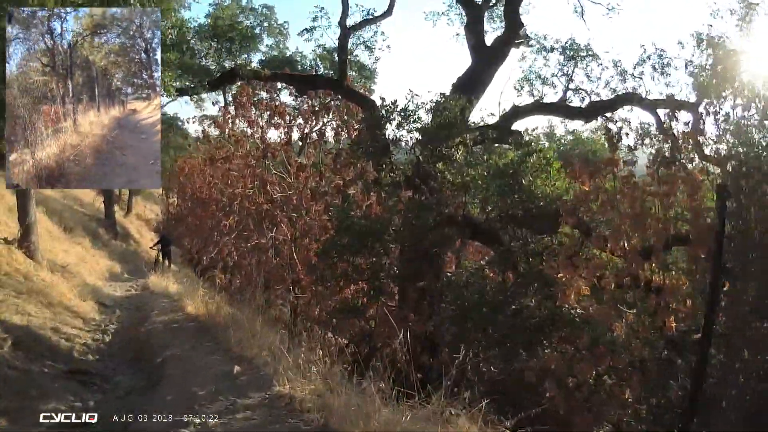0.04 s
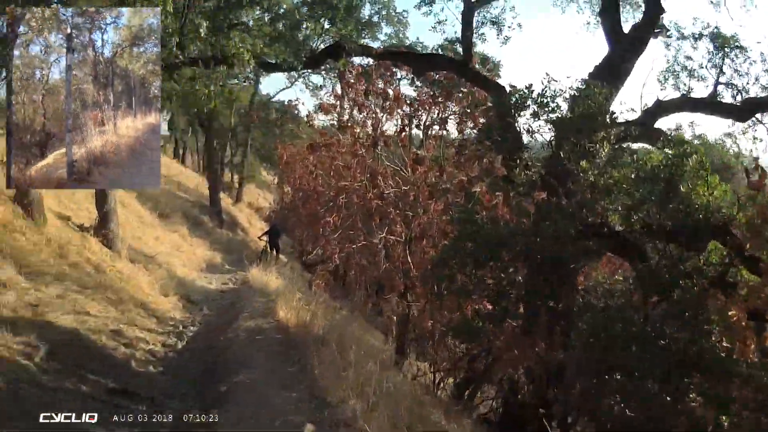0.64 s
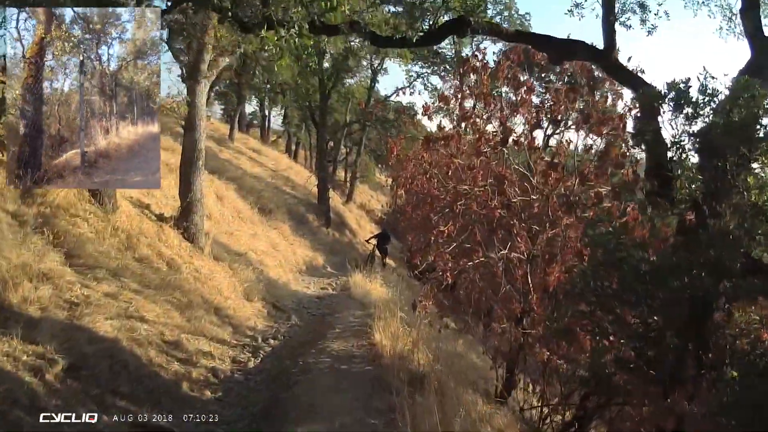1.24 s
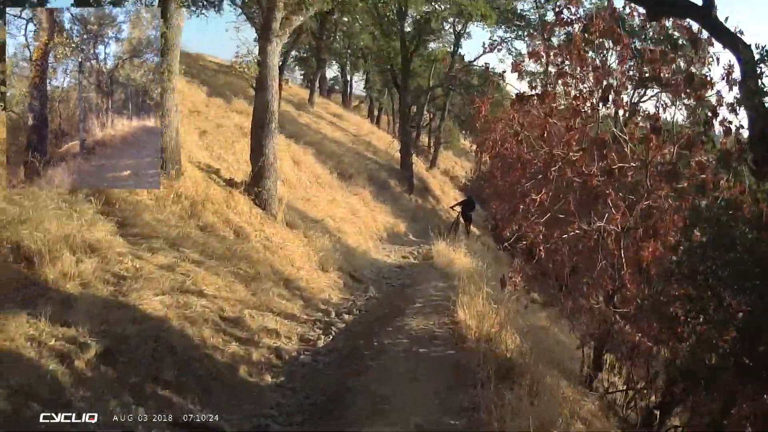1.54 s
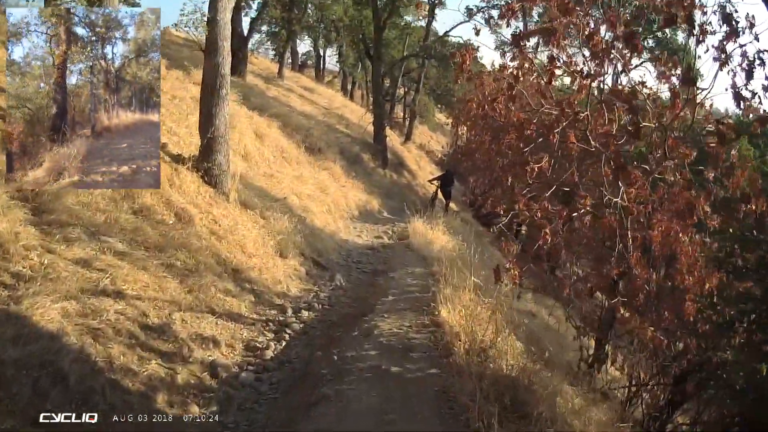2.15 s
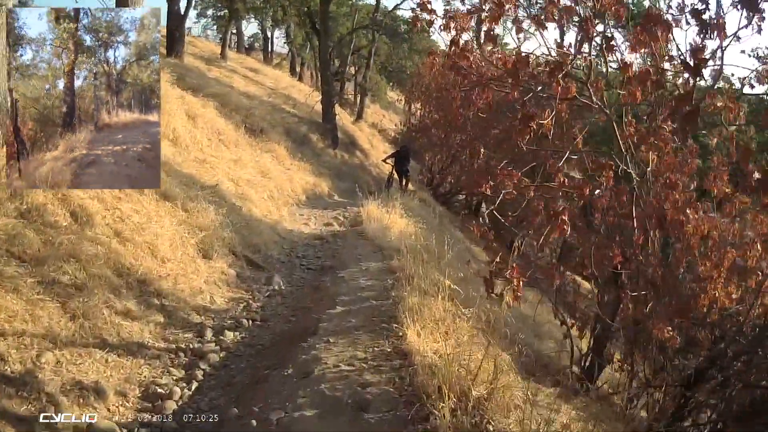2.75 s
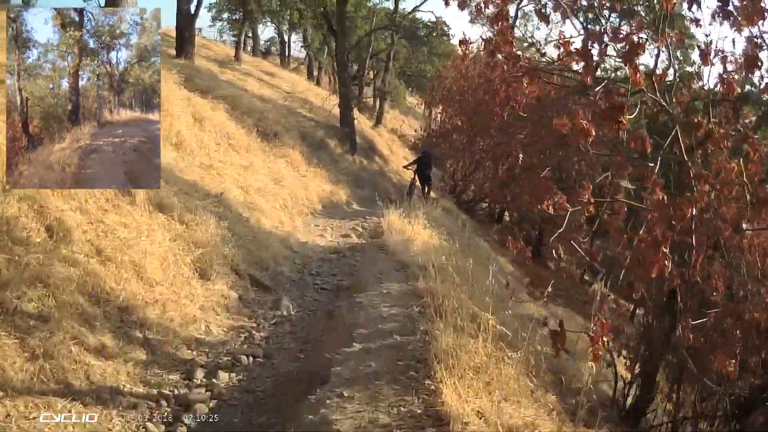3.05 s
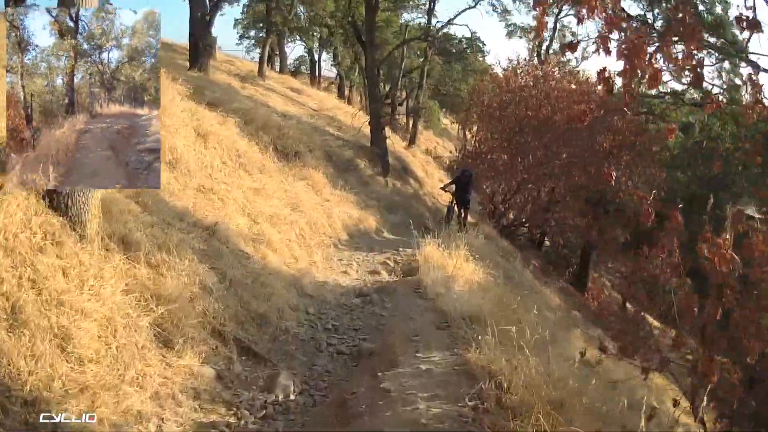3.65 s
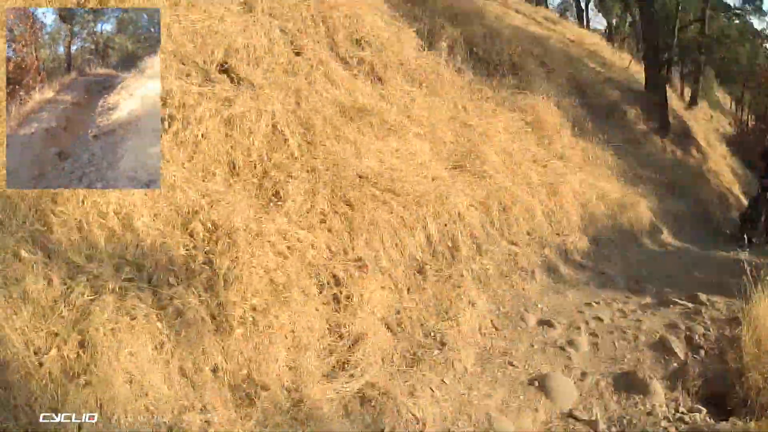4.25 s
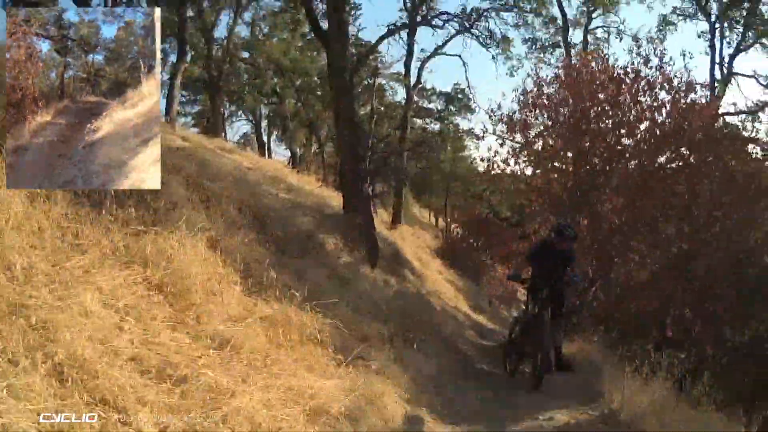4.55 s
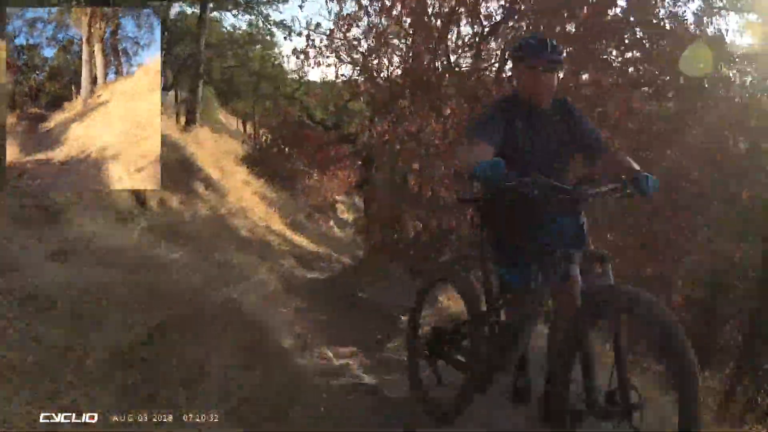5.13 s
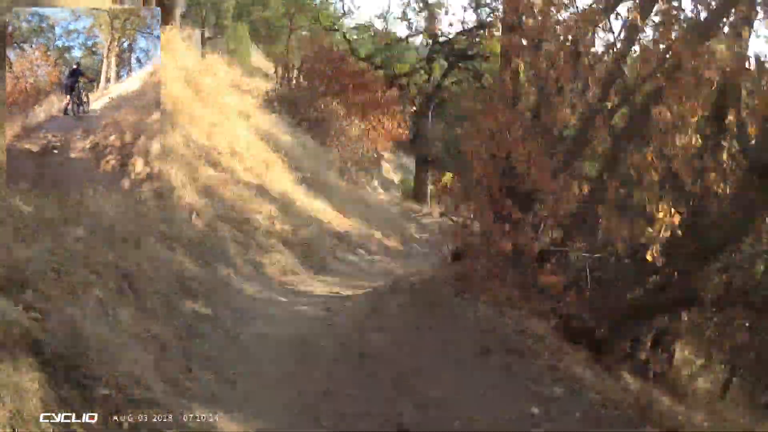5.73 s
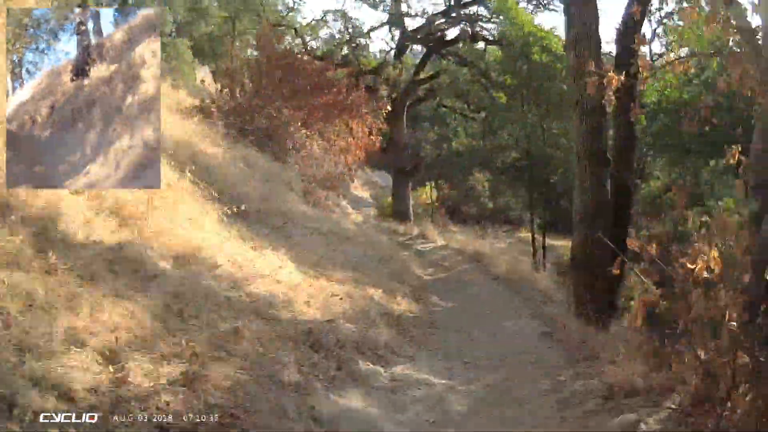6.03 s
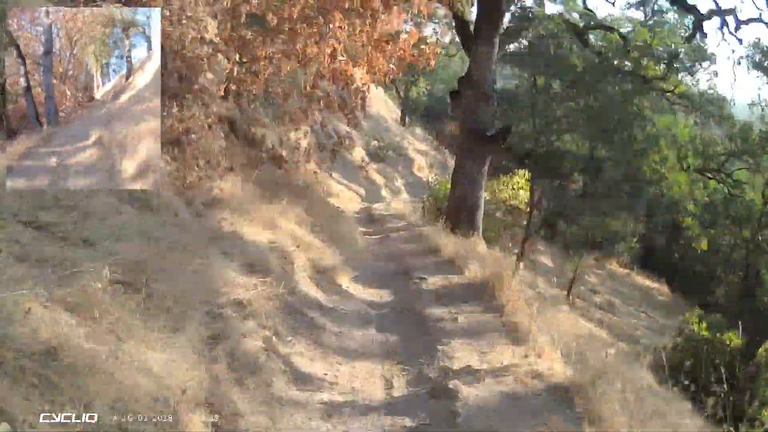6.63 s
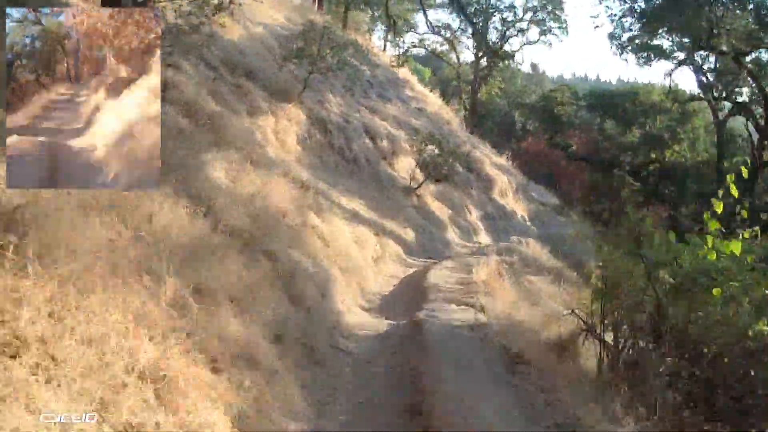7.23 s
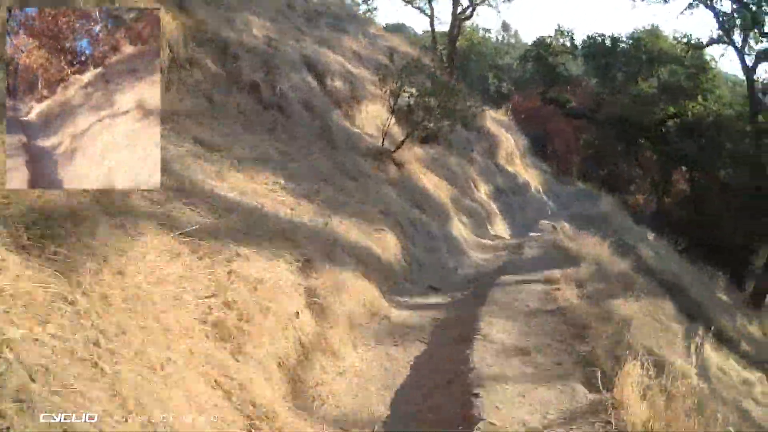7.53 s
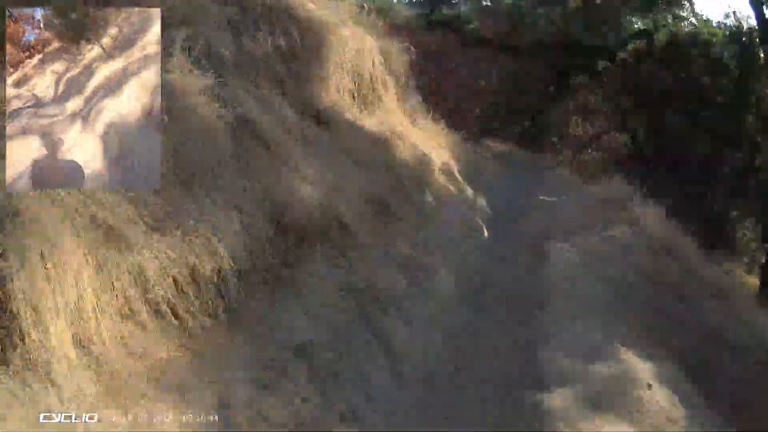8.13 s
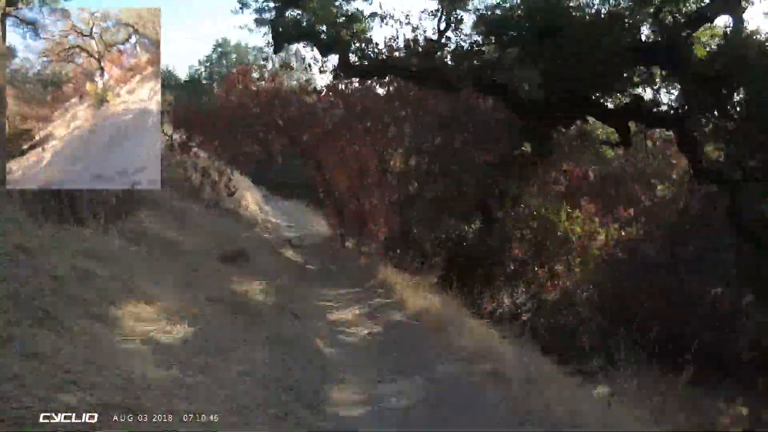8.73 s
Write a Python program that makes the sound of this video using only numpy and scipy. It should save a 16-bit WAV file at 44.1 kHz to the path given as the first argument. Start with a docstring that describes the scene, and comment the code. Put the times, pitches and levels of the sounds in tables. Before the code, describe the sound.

Bright clicks and hollow knocks clatter close to a bike-mounted microphone as a mountain bike bumps along a dirt trail outdoors. The rattle peaks with a few hard gravel crunches, then eases for a moment. In the second half the pace picks up and gritty tyre crunching and crackling take over, with lighter ticks from kicked stones. Soft rushing air and a low shaking rumble continue throughout.

```python
"""Sharp ticks and dull knocks rattle up the camera mount of a mountain bike rolling down a dry dirt trail.
Later the bike gathers speed and the tyres crunch through loose grit: the looser the ground, the more
stones the tread kicks up, and the ground noise ducks in a short hop before a landing.
Frame rumble and a rush of air lie underneath. The hits and grit are coloured by the mount and by the
small camera's plastic case, which rings differently at each of its two microphone ports."""
import sys
import numpy as np
from scipy import signal
from scipy.fft import rfft, irfft
from scipy.io import wavfile

SR = 44100
rng = np.random.default_rng(int(sys.argv[2]) if len(sys.argv) > 2 else 0)


def transcribe(signal):
    """Save signal, clipped to [-1, 1], as a 16-bit WAV file at the path in sys.argv[1]."""
    frames = np.atleast_2d(signal).T
    limited = np.clip(frames, -1, 1)
    pcm = np.round(limited * 32767).astype(np.int16)
    wavfile.write(sys.argv[1], SR, pcm)


N = 391608

# the trail under the tyres: t/s, loose grit/dB, fine dirt/dB, bumpiness/dB, frame shake/dB
TRAIL = [(0, -47, -50, -76, -62), (.45, -43.5, -47, -65, -60), (.8, -40, -38, -57, -59),
         (2.5, -38, -43.5, -46.5, -53), (3.45, -39.5, -40.5, -75, -52), (3.73, -41, -44, -68, -59),
         (3.9, -42, -51, -73, -65.5), (4.25, -34.5, -43.5, -43, -61), (4.6, -45.5, -50.5, -63, -59),
         (4.92, -44, -45.5, -49, -64.5), (5.15, -37.5, -43, -54, -60.5), (5.92, -36.5, -47, -46.5, -56.5),
         (6.12, -33, -36, -41, -58), (6.45, -33.5, -34, -42, -53), (6.65, -35, -48, -60, -52.5),
         (6.92, -33.5, -37, -38.5, -58.5), (7.3, -31, -31.5, -44, -52), (7.75, -33.5, -36.5, -41.5, -50.5),
         (8.1, -36, -46, -51, -52.5), (8.6, -34, -34.5, -37.5, -58)]
# the pace of the ride: t/s, tread knob rate/Hz, air rush/dB
ROLLING = [(0, 22.1, -51.5), (1.2, 24.7, -50.5), (3.4, 24.9, -46.5), (3.9, 26.3, -54.5), (4.5, 25, -57.5),
           (5.6, 33, -52), (7.4, 54.2, -47), (8.88, 51.5, -54)]
# tyres landing in gravel: t/s, level/dB, length/ms, dip in the hop before/dB (negative: a swell)
LANDINGS = [(.788, -35, 12, 9), (2.409, -35, 12, -1), (2.509, -25, 13, 5), (2.542, -28.5, 7.8, -2),
            (2.798, -21.5, 14.3, -1), (2.819, -17.5, 10.8, 2), (2.890, -23, 7.1, -10.5),
            (2.974, -31, 8.8, 0), (2.999, -27, 12, -6), (3.052, -24.5, 7.5, -4), (4.099, -38, 36, 1),
            (4.140, -34, 15, -5), (4.24, -35, 13.5, 4), (4.285, -32.5, 6.7, -1), (4.338, -33.5, 23, -3),
            (4.492, -32.5, 9.6, 19), (4.808, -36.5, 17, 0.5), (5.039, -30.5, 23.4, 3),
            (5.390, -41.5, 29, 9), (5.486, -29, 19, 6), (5.541, -29.5, 27, -5), (5.805, -34.5, 8.8, -1),
            (6.040, -33.5, 37.6, -3.5), (6.111, -32, 21.6, -5), (6.325, -39, 16.8, 1.5),
            (6.794, -32.5, 9.3, 1), (6.865, -34.5, 27, 4.5), (7.064, -31, 22, 7.5), (7.211, -33.5, 16, 0),
            (7.26, -34.5, 41, -1), (7.312, -27.5, 8.5, 0.5), (7.650, -33, 48, 0), (7.799, -32.5, 29, 5),
            (8.015, -27.5, 14.8, 9), (8.241, -32, 31, 0.5), (8.620, -30, 26, 5), (8.707, -31, 19, 4)]
# modes of the plastic case: f/Hz, width/Hz, left port/dB, right port/dB
CASE_MODES = [(560, 230, 3, 3), (1016, 250, 0.5, 4), (1784, 810, 4, 7.5), (2163, 406, 13.5, 13.5),
              (2410, 328, 14, 14), (2952, 494, 2.5, 16.5), (3203, 292, 15, 20.5), (3376, 586, 11, 15),
              (4200, 360, 11, 7.5), (4630, 183, 4, 10.5), (5160, 570, 11.5, -9), (5796, 410, 14.5, -8),
              (6090, 440, 6, 12), (6560, 455, 16, -16), (7380, 560, -8, 10.5), (7920, 310, 11.5, 9.5),
              (8640, 690, 2, 7), (9601, 637, 18, 12), (9574, 415, 20.5, 14), (10760, 1020, -0.5, 12.5),
              (12730, 4400, 0, 0), (15100, 560, 0, 4.5)]
# modes of the mount: f/Hz, width/Hz, left port/dB, right port/dB
MOUNT_MODES = [(182, 19, 5.5, 5.5), (334, 16, -4, 8.5), (473, 46, 11.5, -4), (486, 13, 13.5, 8.5),
               (501, 113, 16, 19), (636, 131, 21, 21.5), (687, 250, 8.5, -10), (920, 174, 15, 12.5),
               (1175, 58, 12, 14.5), (1702, 67, 20.5, 10), (2015, 123, -5, 21), (2350, 310, 6, 14.5),
               (2900, 400, 4, 12), (3820, 1000, 6, -18), (6300, 3900, 3.5, -11)]

CASE_LAG_MS, MOUNT_LAG_MS = 0.2178, 0.32   # the right port hears each body this much later
RING_SIZE, TICK_SPAN_MS = 1536, 6.3   # samples in a body's ring; span that sets a tick's level
LOOSE_GRIT_DB = -34   # grit level that counts as loose ground


def from_db(db):
    """Decibels to gain."""
    return 10 ** (np.asarray(db) / 20)


def rms_one(x):
    """Scale to rms 1."""
    return x / np.sqrt(np.mean(x ** 2) + 1e-20)


def level_over(sound, ms):
    """Rms of a short stereo sound if all its energy fell within ms."""
    return np.sqrt(np.sum(sound ** 2) / 2 / (ms / 1000 * SR) + 1e-20)


def in_time(rows):
    """Each column of an automation table, sample by sample."""
    times, *columns = np.transpose(rows)
    return [np.interp(np.arange(N) / SR, times, column) for column in columns]


def add(out, s, sound):
    """Mix a sound into the stereo track at time s."""
    i = int(np.clip(round(s * SR), 0, N - 1))
    out[:, i:i + sound.shape[1]] += sound[:, :N - i]


def butter(kind, hz, order=2):
    """A Butterworth filter as a function."""
    sos = signal.butter(order, np.clip(hz, 10, .45 * SR), kind, fs=SR, output="sos")
    return lambda x: signal.sosfilt(sos, x)


def drift(rate_hz):
    """Smooth random modulation, rms 1."""
    hz = np.fft.rfftfreq(N, 1 / SR)
    return rms_one(irfft(rfft(rng.standard_normal(N)) / (1 + (hz / rate_hz) ** 2), N))


def port_noise(size, apart):
    """Noise common to both ports, widened by `apart` times a noise of each port's own."""
    return rng.standard_normal(size) + apart * rng.standard_normal((2, size))


def coloured_noise(spectrum, apart):
    """Steady stereo noise of a given spectrum, rms 1."""
    hz, db = np.transpose(spectrum)
    log_hz = np.log(np.fft.rfftfreq(N, 1 / SR) + 1e-9)
    colour = from_db(np.interp(log_hz, np.log(hz), db, left=-25, right=-70))
    return rms_one(irfft(rfft(port_noise(N, apart)) * colour, N))


def body_ring(modes, lag_ms, vary_db=0):
    """A tapped body rings at the two ports; each spot tapped reweights its modes by about vary_db."""
    hz, width, left_db, right_db = np.transpose(modes)
    t = np.arange(RING_SIZE) / SR - np.array([[0], [lag_ms / 1000]])
    spot_db = vary_db * rng.standard_normal(len(hz))
    polarity = (-1) ** np.arange(len(hz))
    gains = from_db([left_db + spot_db, right_db + spot_db]) * width * polarity
    age = np.maximum(t, 0)[:, None]
    rings = np.exp(-np.pi * width[:, None] * age) * np.sin(2 * np.pi * hz[:, None] * age)
    return rms_one((gains[..., None] * rings).sum(axis=1))


def drive(body, force):
    """A force sets a body ringing."""
    return signal.fftconvolve(np.atleast_2d(force), body, axes=1)


def air_rush():
    """A smooth bed of air rushing past the camera."""
    # spectrum of the rush: f/Hz, level/dB
    spectrum = [(150, -23), (350, -6), (520, 12.5), (750, -6), (1100, 12.5), (1600, 2), (2200, 4.5),
                (3100, 12), (4500, 2.5), (9000, -58)]
    _, rush_db = in_time(ROLLING)
    return from_db(rush_db) * coloured_noise(spectrum, apart=0.82)


def frame_rumble(gain_db=1.0, lumpy_db=3.0):
    """The frame shakes: a lumpy low end, alike at both ports."""
    # spectrum of the shaking frame: f/Hz, level/dB
    spectrum = [(20, 3.5), (33, -14), (46, 4), (60, -3.5), (100, -5), (150, -12), (250, -13.5),
                (400, -11.5), (800, -47)]
    *_, shake_db = in_time(TRAIL)
    return from_db(shake_db + gain_db + lumpy_db * drift(12)) * coloured_noise(spectrum, apart=0.024)


def tyre_thumps(decay_s=0.0063, gain_db=6.5):
    """A tyre squashes on a bump and rings softly for a few cycles."""
    # tyre squashes: t/s, level/dB, f/Hz
    squashes = [(2.284, -45.5, 189), (2.641, -48, 298), (2.822, -39.5, 313), (2.973, -49, 234),
                (3.388, -46, 117), (5.036, -50.5, 317), (5.313, -52.5, 144), (5.484, -47, 315)]
    out, t = np.zeros((2, N)), np.arange(4 * RING_SIZE) / SR
    swell = t / decay_s * np.exp(1 - t / decay_s)
    for s, db, hz in squashes:
        thump = swell * np.sin(2 * np.pi * hz * t)
        add(out, s, from_db(db + gain_db) * thump[None])
    return out


def metal_pings(apart_rad=0.5):
    """Now and then a bump leaves a metal part ringing."""
    # ringing bike parts: t/s, peak level/dB, f/Hz, t60/s
    rings = [(1.458, -33, 1020, 0.14), (2.404, -33, 3080, 0.13), (2.486, -23, 1140, 0.069),
             (2.854, -31, 960, 0.067), (7.006, -30, 2090, 0.056), (7.217, -30, 2060, .06),
             (7.439, -24, 2060, 0.047)]
    out, t = np.zeros((2, N)), np.arange(5 * RING_SIZE) / SR
    for s, db, hz, t60 in rings:
        tone = np.sin(2 * np.pi * hz * t - [[0], [apart_rad]])
        add(out, s, from_db(db - 60 * t / t60) * tone)
    return out


def knob_count():
    """Running count of tread knobs meeting the ground, at a slightly uneven pace."""
    knob_hz, _ = in_time(ROLLING)
    return np.cumsum(knob_hz * (1 + 0.18 * drift(12.3))) / SR


def tread_pressure(knobs, sharpness=2.1, uneven_db=3.5, floor=0.41):
    """Each tread knob presses on the ground in a short swell; rms 1."""
    swell = np.exp(sharpness * (np.cos(2 * np.pi * knobs) - 1))
    return rms_one(floor + swell * from_db(uneven_db * drift(18)))


def looseness(grit_db):
    """How freely the ground gives up stones: 1 on loose grit."""
    return from_db(grit_db - LOOSE_GRIT_DB)


def tyre_grip(lead_ms=32.7, half_width_ms=20):
    """Gain on the ground noise just before each landing: it ducks as the tyre hops, or else swells."""
    ms, gain_db = np.arange(N) / SR * 1000, np.zeros(N)
    for s, _, _, dip_db in LANDINGS:
        from_hop = (ms - 1000 * s + lead_ms) / half_width_ms
        gain_db -= dip_db / (1 + from_hop ** 4)
    return from_db(gain_db)


def grains(modes, lag_ms, per_s, level_db, spread_db, chatter_ms, vary_db, count=32):
    """Small random impacts on a body, drawn from a pool of hits that vary in chatter and colour."""
    out, ms = np.zeros((2, N)), np.arange(RING_SIZE // 4) / SR * 1000
    pool = []
    for length_ms in chatter_ms * rng.uniform(0.3, 1.77, count):
        force = port_noise(len(ms), apart=0.52) * np.exp(-ms / length_ms)
        hit = drive(body_ring(modes, lag_ms, vary_db), force)
        pool.append(hit / level_over(hit, TICK_SPAN_MS))
    chance, size, pick = rng.random(N), rng.standard_normal(N), rng.integers(0, count, N)
    for i in np.flatnonzero(chance < per_s / SR):
        add(out, i / SR, from_db(level_db[i] + spread_db * min(size[i], 1.6)) * pool[pick[i]])
    return out


def rolling_tyres(case, knobs, scuff_db=-5.5, fine_db=-2.5, patchy_db=6.0):
    """The tread scuffs through grit and dirt, flicking up small stones and jiggling the mount."""
    grit_db, dirt_db, bump_db, _ = in_time(TRAIL)
    pressure = tread_pressure(knobs)
    sand = port_noise(N, apart=0.81) * from_db(9.6 * drift(270))
    scuff = from_db(grit_db + scuff_db) * pressure * rms_one(drive(case, sand)[:, :N])
    dull_case = butter("low", 2800, order=1)(case)
    dirt_gain = from_db(dirt_db + fine_db + patchy_db * drift(24)) * np.sqrt(pressure)
    dirt = dirt_gain * rms_one(drive(dull_case, port_noise(N, apart=0.76))[:, :N])
    stones = grains(CASE_MODES, CASE_LAG_MS, per_s=110 * looseness(grit_db), level_db=grit_db - 6,
                    spread_db=3, chatter_ms=0.73, vary_db=3.0)
    jiggle = grains(MOUNT_MODES, MOUNT_LAG_MS, per_s=65, level_db=bump_db + 3.5,
                    spread_db=4, chatter_ms=1.36, vary_db=1.5)
    return scuff + dirt + stones + butter("low", 1500, order=1)(jiggle)


def gravel_crunches(case, mount, grain_db=7.0, soft_hz=3200, mount_db=-11, gain_db=4.0):
    """Gravel gives way under a landing tyre in a swell of tiny fractures."""
    out, size = np.zeros((2, N)), 3 * RING_SIZE
    ms = np.arange(size) / SR * 1000
    body = rms_one(butter("low", soft_hz, order=1)(case)) + from_db(mount_db) * mount
    for s, db, length_ms, _ in LANDINGS:
        age = ms / length_ms
        swell = age * np.exp(-(age / 0.8) ** 2)
        fractures = from_db(grain_db * np.repeat(rng.standard_normal(size // 32), 32))
        crunch = drive(body, port_noise(size, apart=1.0) * fractures * swell)
        add(out, s, from_db(db + gain_db) * crunch / level_over(crunch, length_ms))
    return out


def mount_knocks(mount, rub=0.11, rub_ms=2.55, rebound_s=0.031, rebound_db=-19, hard_db=-19, hard_hz=2700):
    """The mount takes up its play with a bump and a brief rub, then falls back once."""
    # knocks of the mount over bumps: t/s, level/dB
    bumps = [(.6315, -21), (.8146, -21.5), (1.067, -35.5), (1.189, -32), (1.2476, -33), (1.316, -27.5),
             (1.4583, -23), (1.5954, -27), (1.6536, -29.5), (1.7493, -24.5), (1.8717, -26), (1.9015, -28),
             (2.0204, -21), (2.0736, -23), (2.2285, -30), (2.3185, -22.5), (2.3662, -20.5), (2.476, -23),
             (2.5127, -23.5), (2.6485, -25.5), (2.8235, -23), (2.8903, -20.5), (3.0003, -20.5),
             (3.0535, -26), (3.2872, -34.5), (3.3782, -29), (4.1259, -37), (4.1438, -36), (4.3386, -32),
             (4.7972, -33.5), (4.826, -34), (5.4998, -36), (5.5415, -32), (5.812, -34), (6.4497, -33.5),
             (6.8133, -31.5), (6.882, -38), (6.9056, -32), (7.005, -30.5), (7.3002, -34), (7.626, -31.5),
             (8.331, -30.5)]
    rebounds = [(s + rebound_s, db + rebound_db) for s, db in bumps]
    out, ms = np.zeros((2, N)), np.arange(RING_SIZE) / SR * 1000
    hollow = butter("band", [420, 800])   # this band sets a knock's level
    for s, db in bumps + rebounds:
        force = rub * port_noise(RING_SIZE, apart=0.31) * np.exp(-(ms / rub_ms) ** 2)
        force[:, 0] += 1
        cutoff_hz = max(hard_hz * from_db(db - hard_db), 900)   # hard knocks clack, light ones thud
        knock = butter("low", cutoff_hz)(drive(mount, force))
        add(out, s, from_db(db) * knock / level_over(hollow(knock), ms=4.46))
    return out


def evened(force, share=0.12):
    """Flatten a force's spectrum a little: a hard contact drives all pitches about equally."""
    spectrum = rfft(force)
    return irfft(spectrum / (abs(spectrum) + 1e-3) ** share, force.shape[-1])


def ticks(case, hits, body_db, chatter=0.2, graze_db=-25, graze_ms=0.5, tail_db=-32, tail_ms=9):
    """A hard contact grazes, hits, chatters and leaves a faint rattle, all ringing through the case."""
    out, lead = np.zeros((2, N)), RING_SIZE // 6
    ms = (np.arange(RING_SIZE) - lead) / SR * 1000
    low, high = butter("low", 4300, order=4), butter("high", 4300, order=4)
    soften = butter("low", 13000)
    graze = from_db(graze_db) * np.exp(-abs(ms) / graze_ms)
    tail = from_db(tail_db) * np.exp(-abs(ms) / tail_ms)
    for s, db, chatter_ms in hits:
        decay = np.exp(-(abs(ms) / chatter_ms) ** 1.3) + tail
        force = chatter * port_noise(RING_SIZE, apart=1.0) * np.where(ms < 0, graze, decay)
        force[:, lead] += 1
        tick = soften(drive(case, evened(force)))
        treble, body = high(tick), low(tick)
        treble = treble / level_over(treble, TICK_SPAN_MS)
        body = from_db(body_db) * body / level_over(body, TICK_SPAN_MS)
        add(out, s - lead / SR, from_db(db) * (treble + body))
    return out


def kicked_stones(case, knobs, kick_share=0.6, loose_kick_db=-29, follow_grit=0.24, spread_db=2.5):
    """Tread knobs kick stones against the bike, more often and a little harder on looser ground."""
    at = np.flatnonzero(np.diff(np.floor(knobs)) > 0)
    grit_db = in_time(TRAIL)[0][at]
    chance, size, length = rng.random((len(at), 3)).T
    db = loose_kick_db + follow_grit * (grit_db - LOOSE_GRIT_DB) + spread_db * (2 * size - 1)
    chatter_ms = 1.33 * (0.5 + length)
    hits = np.transpose([at / SR, db, chatter_ms])
    kicked = chance < kick_share * looseness(grit_db)
    return ticks(case, hits[kicked], body_db=-21.0)


def bike_rattle(case):
    """Stones and rattling parts send sharp, bright ticks into the case."""
    # hard contacts on the bike: t/s, treble level/dB, chatter/ms
    hits = [(0.0287, -25.5, 2.1), (0.1046, -14.5, 1.3), (0.2422, -23, 0.9), (0.403, -15.5, 1.16),
            (0.4729, -28.0, 1.4), (0.666, -20.5, 1.3), (0.7542, -19, 1.5), (0.914, -29, 0.87),
            (0.929, -14.0, 2.4), (0.9791, -19, 1.2), (0.9917, -18, 0.61), (1.1238, -23.5, 1.2),
            (1.153, -35, 0.34), (1.2205, -12.5, 1.9), (1.329, -16.5, 0.78), (1.3797, -17.5, 1.6),
            (1.4196, -23.0, 0.73), (1.477, -22, 0.65), (1.5633, -12, 1.9), (1.598, -17.5, 4.0),
            (1.632, -16, 1.9), (1.6653, -12.5, 2.1), (1.7208, -16, 1.3), (1.7621, -15.0, 1.4),
            (1.912, -21, 0.94), (1.9408, -21.5, 0.49), (2.0373, -21.5, 1), (2.0836, -12.5, 2.4),
            (2.2145, -22.5, 0.33), (2.271, -25, 1), (2.2796, -20, 1), (2.3258, -13.5, 1.7),
            (2.3658, -20, 0.73), (2.3774, -10, 1.9), (2.3975, -22.0, 1.3), (2.488, -16, 3),
            (2.5772, -20, 0.7), (2.6988, -15.5, 0.85), (2.806, -16.0, 2.2), (2.8768, -15.5, 2.3),
            (2.9474, -10, 1.8), (3.0555, -12.0, 4.5), (3.2426, -24, 0.79), (3.3026, -15.5, 1.6),
            (3.324, -24.5, 1), (3.4112, -14.5, 1.2), (4.1015, -28.5, 2), (4.1609, -26.5, 1.3),
            (4.2945, -26, 2.8), (4.349, -22.5, 1.5), (4.4145, -26.5, 1.4), (4.5138, -26, 0.9),
            (4.5934, -32.0, 0.64), (4.642, -27.5, 1.5), (4.8369, -28, 1.3), (4.9961, -27.5, 2.9),
            (5.0402, -25, 3.9), (5.057, -25.5, 2.3), (5.1522, -24.0, 1.5), (5.1822, -24.0, 2.7),
            (5.2235, -30.5, 1), (5.4008, -27, 1.6), (5.4437, -30, 1.3), (5.545, -24.5, 3.3),
            (5.7595, -25.5, 1.4), (5.7731, -27.0, 0.81), (5.8083, -26.5, 2.8), (5.8785, -26, 2.1),
            (6.1827, -25.5, 2.24), (6.3667, -29, 1.6), (6.5092, -25.0, 3.67), (6.552, -29.5, 1.1),
            (6.7575, -29, 4.6), (6.7799, -23, 1.24), (6.8, -25.5, 3), (6.9164, -25, 1), (7.1423, -27, 4.5),
            (7.5159, -37, 1.55), (8.021, -33, 4.0), (8.0703, -30, 1.2), (8.0919, -32, 1.47),
            (8.2044, -30, 1.57), (8.4034, -33, 3.5), (8.52, -27, 1.3), (8.8086, -27.5, 1.6)]
    return ticks(case, hits, body_db=-15.5)


def scene():
    """Hits in front, tyres on the ground behind them, and a bed of rumble and air."""
    case, mount = body_ring(CASE_MODES, CASE_LAG_MS), body_ring(MOUNT_MODES, MOUNT_LAG_MS)
    knobs = knob_count()
    hits = bike_rattle(case) + mount_knocks(mount) + gravel_crunches(case, mount)
    accents = tyre_thumps() + metal_pings()
    bed = frame_rumble() + air_rush()
    ground = rolling_tyres(case, knobs) + kicked_stones(case, knobs)
    return bed + accents + tyre_grip() * ground + hits


def record(dry):
    """Soft clipping rounds the loudest ticks, and a steep low-pass cuts the top."""
    ceiling, cutoff_hz = 0.62, 15900
    rounded = ceiling * np.tanh(dry / ceiling)
    return signal.sosfilt(signal.ellip(10, .3, 75, cutoff_hz, fs=SR, output="sos"), rounded)


dry = scene()
out = record(dry)
transcribe(out)
```